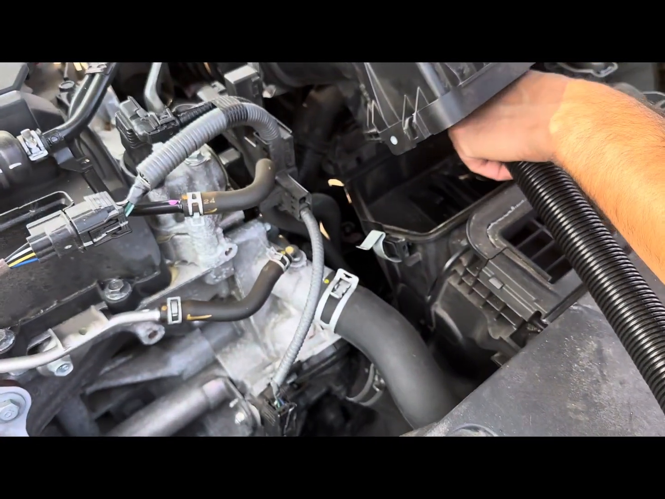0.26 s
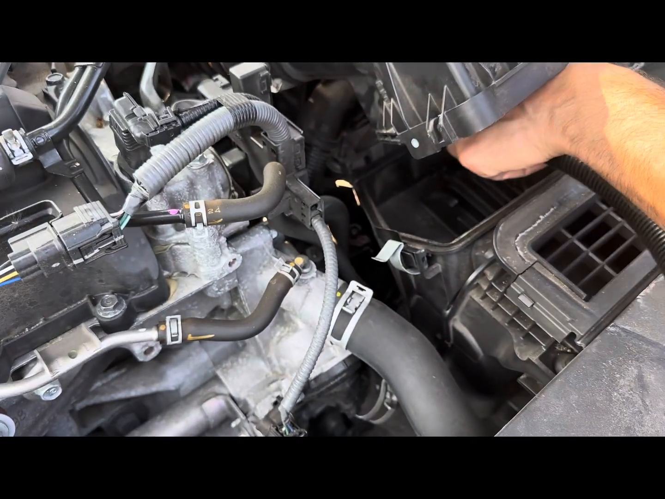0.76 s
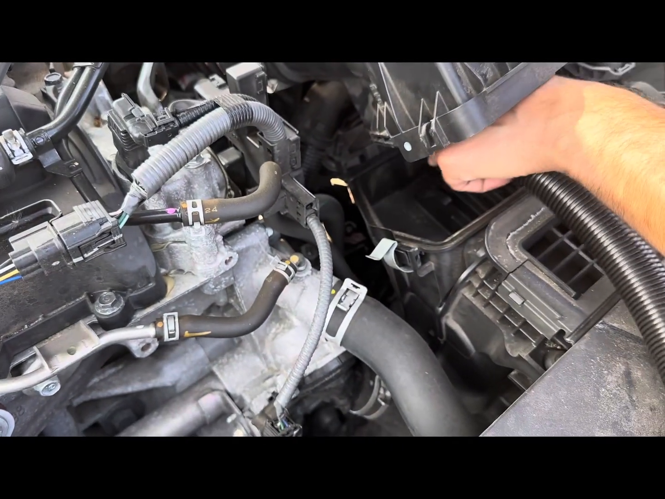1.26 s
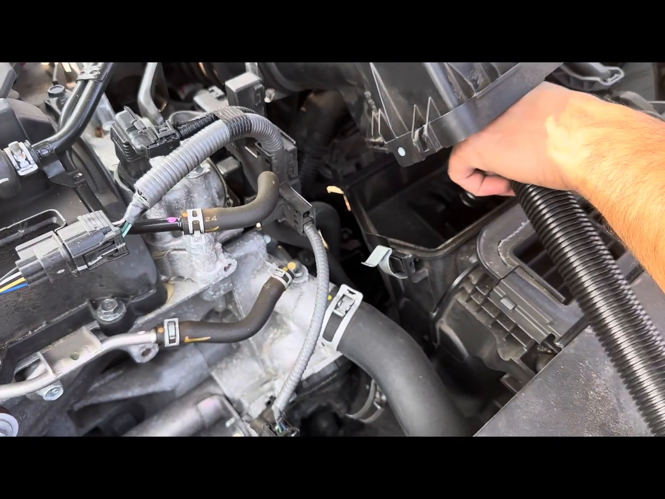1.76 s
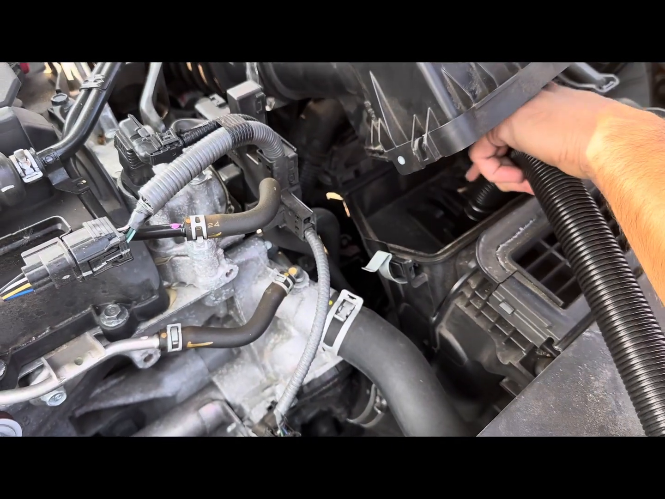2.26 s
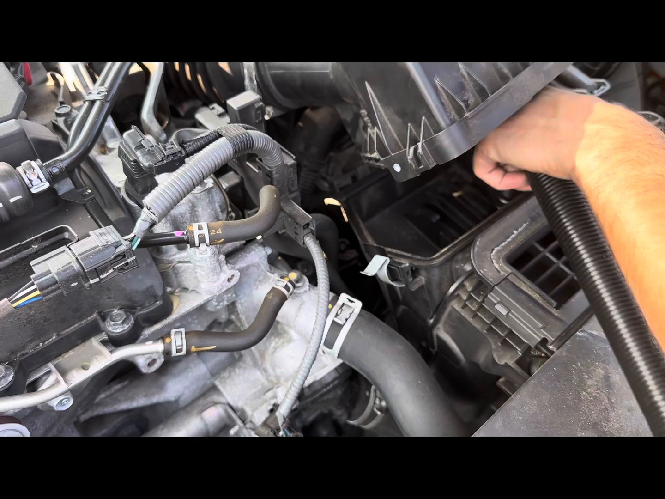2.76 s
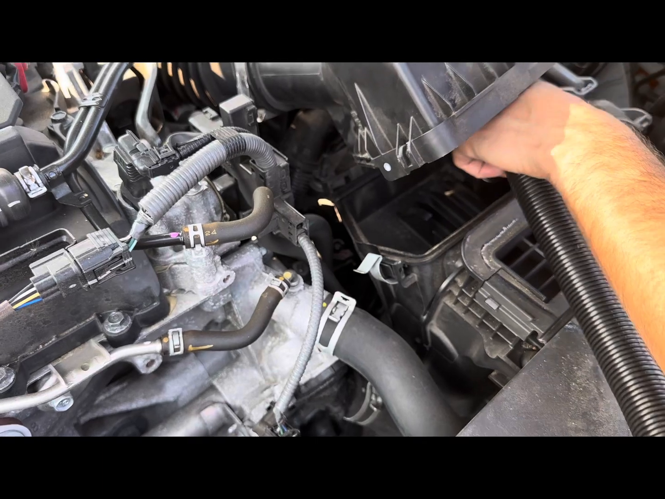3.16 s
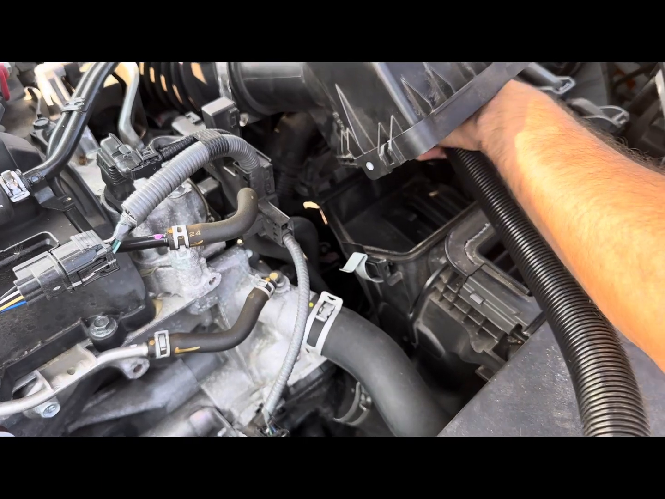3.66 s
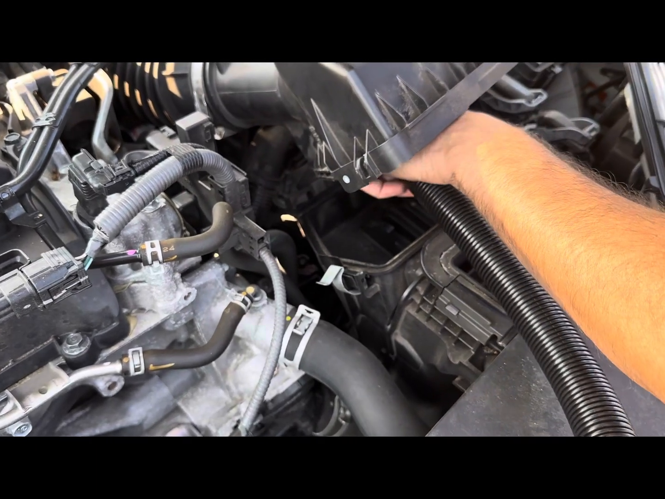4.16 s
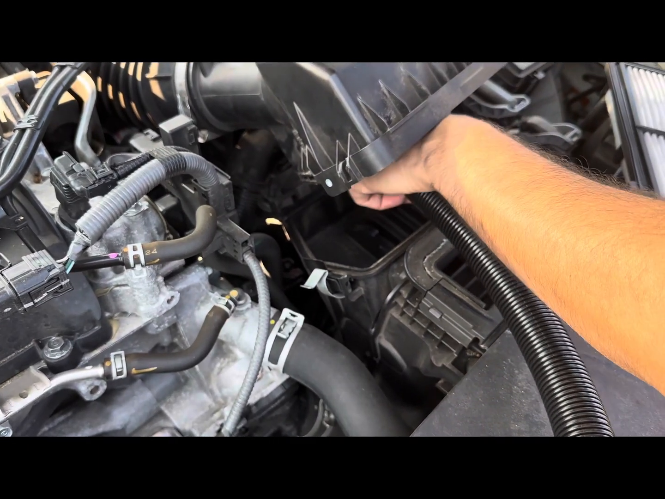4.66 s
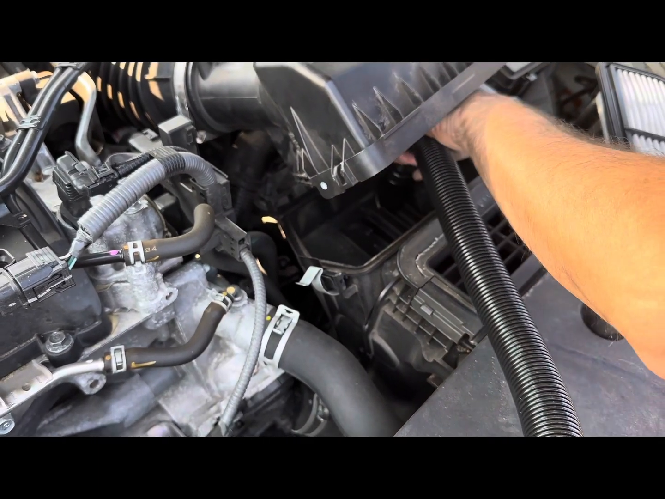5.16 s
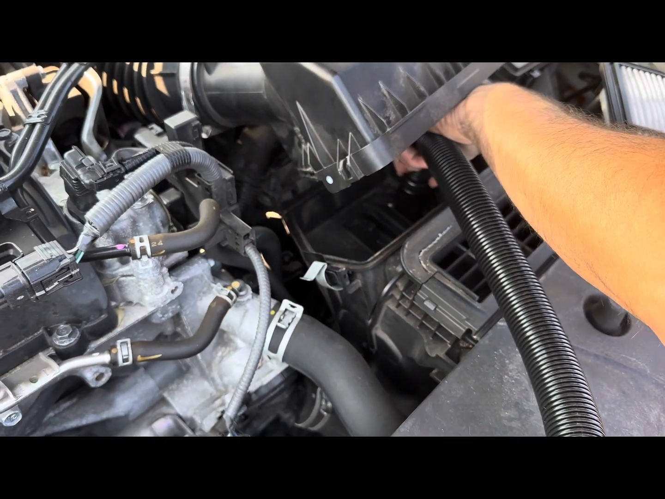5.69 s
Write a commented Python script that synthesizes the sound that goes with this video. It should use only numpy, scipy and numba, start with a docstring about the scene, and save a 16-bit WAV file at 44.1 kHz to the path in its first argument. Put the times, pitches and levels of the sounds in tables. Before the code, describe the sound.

A vacuum cleaner is already running at full power and continues unbroken for about six seconds. A mid-pitched motor hum of roughly 457 hertz, a piercing fan whine near 3.2 kilohertz and a low roar sit under rushing air and bright suction hiss. The ribbed hose adds a warbling half-whistle just below the whine. The nozzle knocks the hollow plastic filter box at 0.2, 0.6, most sharply at 0.9, and around 1.2 seconds, with dull hose bumps. From about 1.5 to 2.4 the hum weakens and flutters, the whine dips near 1.7, and thin high tones sing out. Light bumps and taps come near 2.6, then knocks and a tiny rim scrape at 3.1 to 3.3. A tap at 3.8 precedes a strong clack at 4.07, with smaller ones at 4.4 and 5.0. Later the nozzle hiss is softer and more shaded. Close stereo microphone, dry surroundings.

```python
"""A vacuum cleaner is already running beside a car: a shaft-rate hum, a seven-blade fan whine and rushing air.
Its nozzle works in the open air-filter housing; shaped noise makes the roar, hiss and hollow plastic box.
Swept noise bands make the half-whistle of the hose, and fluttering sines make the motor tones.
The nozzle knocks on the box (decaying modes and noise bursts) and scrapes its rim once (uneven slips).
The hose bumps the car body with dull, dying bands of low noise."""
import sys
import numpy as np
from scipy import signal
from scipy.fft import rfft, irfft
from scipy.io import wavfile
from scipy.ndimage import uniform_filter1d
from numba import njit

SR = 44100
rng = np.random.default_rng(int(sys.argv[2]) if len(sys.argv) > 2 else 0)


def transcribe(signal):
    """Save signal, clipped to [-1, 1], as a 16-bit WAV file at the path in sys.argv[1]."""
    frames = np.atleast_2d(signal).T
    limited = np.clip(frames, -1, 1)
    pcm = np.round(limited * 32767).astype(np.int16)
    wavfile.write(sys.argv[1], SR, pcm)


N = 261513  # length [samples]

# Levels in the tables are starting points: the functions add trims and flutter.
# Likeness of the noise at the two microphone ports: (frequency [Hz], correlation [-1..1])
LIKENESS = [(60, .88), (300, .72), (700, .5), (1200, .45), (1600, -.45), (2300, -.5), (2800, .5),
            (3600, .4), (4400, .05), (5300, -.35), (6400, .4), (7500, -.1), (10000, .1), (12000, .75)]
# Stereo balance of the air noise: (frequency [Hz], left minus right [dB])
BALANCE = [(100, -1.5), (700, 0), (1000, 3.5), (1900, -4), (2800, -6), (3600, 3), (4400, -1), (5200, 0),
           (6700, 0.5), (8800, -0.5), (13000, 0)]
# Phase between the ports around 3 kHz, for whine and hose whistle: (time [s], left lead [rad])
LEAD = [(0, -1.7), (.7, 0.5), (1.52, 0.1), (1.9, -3), (2.3, -2.5), (2.52, 0), (3.2, 0), (3.8, 0.5),
        (4.55, 1.2), (4.85, 1.5), (5.1, 0.2), (5.93, 0.7)]
# How far the nozzle has gone into the box: (time [s], depth [0-1])
DEPTH = [(0, 0.15), (.4, 0), (1.55, 0.28), (2.2, 0.6), (2.55, 0.2), (3.4, 0.57), (4.3, 1), (5.15, 0.94),
         (5.93, 0.93)]

# Noise colour of the steady machine roar: (frequency [Hz], relative level [dB])
ROAR = [(12, -44), (20, -26), (70, 2), (107, -6.5), (149, -2.5), (177, -13), (214, -7), (258, -8),
        (400, -3.5), (520, -2), (880, -120)]
# Noise colour of air rushing through the box: (frequency [Hz], relative level [dB])
BOX_AIR = [(250, -10), (380, 2.5), (520, 5.5), (700, -1), (1000, 1.5), (1300, -3), (1550, -0.5), (1900, 5),
           (2500, 5), (3400, 0), (3800, -58)]
# Air resonances of the open box: (frequency [Hz], width of each filter pass [Hz], relative level [dB])
CAVITY = [(655, 118, 0.5), (913, 134, -2.5), (1203, 163, 0), (1382, 91, -1), (1700, 78, 2), (1891, 88, 5),
          (2128, 83, 3.5), (2281, 79, 4)]
CAVITY_DRIFT = .014  # share by which the moving hand detunes them
# Hollow ring of the box: (time [s], level [dB])
HOLLOW = [(0, -34), (1.2, -35.5), (1.6, -35), (2.7, -36.5), (3.0, -36), (4.4, -37), (4.95, -34.5),
          (5.5, -36), (5.93, -33.5)]

# Hose bumping the body: (time [s], level [dB], t60 [s], centre [Hz])
BUMPS = [(0.205, -39, 0.14, 150), (0.59, -34.5, 0.19, 145), (1.143, -30, 0.3, 135),
         (1.236, -31.5, 0.25, 165), (1.439, -40.5, 0.28, 170), (2.16, -36, 0.2, 190),
         (2.556, -35, 0.13, 150), (2.649, -34, .15, 160), (4.074, -28, 0.14, 215), (4.756, -33, 0.14, 150)]
# Modes of the plastic housing: (frequency [Hz], t60 [s], relative level [dB])
BOX_MODES = [(640, .035, -2), (780, .045, 0), (926, .055, -.5), (1215, .05, -.5), (1310, .035, -1.5),
             (1445, .05, -4), (1700, .055, -2), (1930, .05, -8), (2125, .06, .5), (2680, .03, -8)]
# Nozzle scraping on the rim: (time [s], length [s], level [dB], first centre [Hz], last centre [Hz])
SCUFFS = [(3.277, 0.055, -32, 1850, 1700)]
SLIPS_PER_S = 170  # on average
# Nozzle against housing: (time [s], level [dB], centre of the ring [Hz], low cut [Hz], crack level [dB])
KNOCKS = [(.180, -20.5, 1130, 830, -16), (.617, -27, 1310, 800, -10), (.879, -29, 1300, 826, -20),
          (0.891, -13.5, 1280, 860, -20), (.897, -21.5, 1350, 860, -14), (1.162, -27.5, 1400, 950, -13),
          (1.238, -25.5, 1600, 700, -10), (1.250, -30, 1600, 600, 3), (2.56, -37, 1300, 500, -8),
          (2.650, -32, 1200, 600, -8), (3.070, -27.5, 1100, 800, -20), (3.246, -32, 1200, 700, -12),
          (3.294, -28.5, 1150, 1050, -20), (3.316, -34, 1550, 1000, -16), (3.830, -30, 1250, 620, -16),
          (4.0737, -17, 1650, 650, -12.5), (4.0765, -23, 540, 250, -1), (4.422, -31, 1500, 700, -12),
          (4.914, -32.5, 1700, 800, -12), (4.988, -25, 1250, 620, -15)]
KNOCK_DETUNE = 0.019  # share by which the pressing nozzle shifts the modes from knock to knock

# Hose whistle: (time [s], lower resonance level [dB], upper resonance level [dB])
WHISTLE = [(0.0, -44, -46), (0.08, -37, -38), (0.33, -32, -36), (0.92, -39.5, -34), (1.17, -32, -33.5),
           (1.58, -35.5, -37), (1.66, -29, -44), (1.72, -30, -35), (1.78, -33.5, -43), (2.11, -37, -44),
           (2.29, -36, -39), (2.37, -32, -39), (2.48, -30, -33), (2.62, -31.5, -37), (2.72, -38, -34),
           (2.86, -34, -37), (2.94, -30.5, -35.5), (3.1, -38, -36), (3.24, -31.5, -35.5), (3.51, -39, -38),
           (3.58, -34, -38.5), (3.78, -33, -33.5), (3.91, -41, -43), (4.02, -34.5, -36), (4.19, -31, -37),
           (4.28, -37, -38), (4.37, -32, -39), (4.71, -34.5, -37), (4.82, -47, -38), (4.88, -38, -43),
           (5.0, -43, -39), (5.15, -38, -38), (5.65, -35.5, -36), (5.86, -39, -39), (5.93, -44, -37.5)]
# Centre of the lower hose resonance: (time [s], frequency [Hz])
WHISTLE_PITCH = [(0, 2760), (1.2, 2760), (1.8, 2735), (2.05, 2750), (2.22, 2815), (2.38, 2730), (3.8, 2764),
                 (4.5, 2765), (5.93, 2770)]
HOSE_UPPER_HZ = 2948  # before the warble

# Noise colour of the main hiss: (frequency [Hz], relative level [dB])
HISS = [(2500, -14), (3400, 2), (3850, 0), (4300, 4), (4600, 1.5), (4900, 2), (5400, -4), (6800, -35),
        (9000, -63)]
# Noise colour of the fine spray of hiss: (frequency [Hz], relative level [dB])
SPRAY = [(5000, -21), (7200, 8.5), (8200, 8), (8500, 6), (8700, 13.5), (8900, 4.5), (9400, 7), (10200, 1.5),
         (11000, -47), (13000, -64.5)]
# Fine spray of hiss: (time [s], level [dB])
SPRAY_LEVEL = [(0, -35), (1.5, -34.5), (2.6, -41), (2.74, -34.5), (3.1, -37.5), (3.8, -36), (4.9, -39),
               (5.93, -38)]
# Gap between nozzle and wall: (time [s], resonance [Hz], hiss level [dB])
GAP = [(0, 6250, -28.5), (.5, 6650, -27), (.7, 5950, -29), (1.12, 5950, -27), (1.27, 6530, -27.5),
       (1.57, 6400, -29.5), (1.87, 5830, -34), (2.25, 6400, -31), (2.42, 6820, -26), (2.6, 6650, -28),
       (2.78, 6060, -35), (3.75, 5950, -34), (4.55, 6010, -36), (4.85, 5900, -40.5), (5.5, 6140, -40),
       (5.93, 6100, -36.5)]
# Notch that the echo from the wall cuts into the hiss: (time [s], centre [Hz], depth [0-1])
NOTCH = [(0, 5300, 0), (.35, 5240, 0.6), (.8, 4850, 0.3), (1.1, 4800, .3), (1.3, 5350, 0.4),
         (1.5, 5280, .8), (1.85, 5150, .4), (2.1, 5100, 0), (2.95, 4930, 0.3), (3.6, 4600, 0.1),
         (4.35, 4250, 0.7), (5.0, 4030, 0.2), (5.75, 3680, 0.4)]
NOTCH_WIDTH_HZ = 290
# Higher cross modes of the nozzle: (frequency [Hz], width of each filter pass [Hz], relative level [dB])
NOZZLE_MODES = [(5300, 140, 4.5), (5580, 170, 3.5), (5950, 110, 2.5), (6400, 91, -4.5), (6650, 130, 2),
                (6876, 154, 1)]
NOZZLE_DRIFT = 0.0093  # share by which the tilting nozzle detunes them
CROSS_REACH_HZ = 1100  # modes farther than this from the gap resonance are hardly stirred
# The hand slips under the lid and shades one side from the nozzle
SHADE_S, SHADE_TAKES_S = 2.71, 0.2  # middle of the move, its length

# Motor speed: (time [s], shaft rate [Hz])
SPEED = [(0, 452), (.2, 455), (.62, 456.6), (1.27, 457.1), (1.57, 456), (2.12, 458.5), (2.55, 456.8),
         (3.05, 457.2), (3.9, 458.3), (4.72, 457.2), (5.35, 458.6), (5.93, 458.4)]
# Hum as the arm moves through its standing waves: (time [s], level [dB])
HUM = [(0, -31.5), (.57, -35.5), (.73, -25), (.83, -31.5), (.96, -28), (1.12, -28), (1.19, -39), (1.5, -37),
       (1.6, -46), (1.83, -43.5), (1.89, -35), (1.96, -35), (2.12, -43.5), (2.25, -35.5), (2.33, -43),
       (2.45, -33), (2.8, -31.5), (2.88, -35.5), (2.97, -30.5), (3.57, -30), (3.7, -33), (3.95, -33.5),
       (4.2, -31), (4.31, -35), (4.42, -29.5), (4.72, -32.5), (4.81, -35.5), (4.92, -29.5), (5.2, -30.5),
       (5.93, -30.5)]
# Brief dips in the hum: (time [s], length [s], drop [dB])
HUM_DIPS = [(0.068, 0.029, 11), (0.545, .035, 8), (1.407, 0.038, 5), (1.986, 0.026, 12), (2.172, .04, 7),
            (2.32, 0.069, 5), (2.696, 0.035, 2), (3.067, 0.03, 8), (3.615, 0.055, 11), (3.745, .045, 4.5)]
DIP_EDGE_S = 0.017
# Fan whine in its standing waves: (time [s], level [dB])
WHINE = [(0, -32), (.35, -32.5), (.75, -25.5), (1.1, -26.5), (1.53, -29), (1.66, -40), (1.73, -46),
         (1.87, -33), (2.06, -38), (2.19, -30), (2.28, -36), (2.33, -36), (2.38, -42), (2.52, -31.5),
         (3.45, -33.5), (3.75, -30), (3.92, -36), (4.08, -32), (4.26, -40), (4.38, -33), (4.64, -30),
         (4.76, -34), (4.85, -34.5), (5.08, -30), (5.93, -32.5)]
# Weaker motor tones: (multiple of shaft rate, level [dB], left minus right [dB])
OVERTONES = [(2, -56, 0), (3, -56, 0), (5, -55, -4), (14, -54, 3), (19, -57, -6), (21, -60, -4)]
# Thin high motor tones: (multiple of shaft rate, level with the nozzle out of the box [dB])
SING = [(10, -49.5), (15, -46.5), (20, -48.5)]
# A thin tone sings out for a moment: (time [s], length [s], multiple of shaft rate, rise [dB])
FLARES = [(1.3, .45, 3, 5), (2.36, .18, 3, 10), (5.81, .2, 3, 12), (1.25, .35, 5, 7), (1.43, .91, 10, 10.5),
          (1.75, .59, 10, 2.5), (1.9, .44, 10, 3.5), (5.2, .55, 10, 7), (1.3, .5, 15, 4),
          (2.33, 1.15, 15, 5.5), (3.5, .65, 15, 4.5), (2.64, .96, 20, 7), (4.63, 0.14, 20, 16)]
FLARE_EDGE_S = 0.03

TOP_HZ = 15750  # edge of the treble cut


def undb(db):
    """Decibels to gain."""
    return 10 ** (np.asarray(db) / 20)


def unit(x):
    """Scale to rms 1."""
    return x / np.sqrt(np.mean(x ** 2))


def curves(table):
    """Each column of a timed table, sample by sample."""
    s, *columns = np.transpose(table)
    return [np.interp(np.arange(N) / SR, s, c) for c in columns]


def bins():
    """Frequencies of the spectrum of the whole scene, kept just above zero."""
    return np.arange(N // 2 + 1) * SR / N + 1e-6


def across(points):
    """Join (frequency [Hz], value) points on a log-frequency axis."""
    hz, value = np.transpose(points)
    return np.interp(np.log(bins()), np.log(hz), value)


def walk(rate):
    """Smooth random wander of rms 1, from about `rate` fresh values a second."""
    k = int(SR / rate)
    held = np.repeat(rng.standard_normal(N // k + 2), k)[rng.integers(k):][:N]
    return unit(uniform_filter1d(uniform_filter1d(held, k), k))


def window(start, length, edge):
    """1 during an event and 0 outside it, with sloping edges."""
    t = np.arange(N) / SR
    return np.clip(.5 + np.minimum(t - start, start + length - t) / edge, 0, 1)


def fade(t, t60):
    """Exponential decay, 60 dB down after t60."""
    return np.exp(-np.log(1000) * t / t60)


def pan(db):
    """Left and right gains for a level difference."""
    return undb(np.array([[1], [-1]]) * db / 2)


def inside(out_db, in_db):
    """A level that moves from one value to another as the nozzle goes into the box."""
    depth, = curves(DEPTH)
    return out_db + (in_db - out_db) * depth


def shaded(open_db, covered_db):
    """A level that changes as the hand slips under the lid."""
    share = np.clip(.5 + (np.arange(N) / SR - SHADE_S) / SHADE_TAKES_S, 0, 1)
    return open_db + (covered_db - open_db) * share


def two_ports(mid, side, alike):
    """Mix shared and opposed noise into two ports of a given correlation."""
    return mid * np.sqrt(1 + alike) + np.array([[1], [-1]]) * side * np.sqrt(1 - alike)


def air(gain):
    """Turbulence of a given colour as the two ports hear it; their mean has rms 1."""
    alike = np.clip(across(LIKENESS), -.98, .98)
    mid, side = rfft(rng.standard_normal((2, N)))
    ports = two_ports(mid, side, alike)
    x = irfft(ports * gain * pan(across(BALANCE)), N)
    return x / np.std(x.mean(axis=0))


def gusty(points, patchy_db=1.9, count=4):
    """Hiss whose interleaved narrow bands swell and fade apart, as the path of the air shifts."""
    spectrum = rfft(air(undb(across(points))))
    group = (bins() // 450).astype(int) % count  # 450 Hz bands, dealt out in turn
    bands = (irfft(spectrum * (group == k), N) * undb(patchy_db * walk(6.5)) for k in range(count))
    return unit(sum(bands))


def burst(t, lo_hz, hi_hz, t60):
    """A dying band of noise, partly alike at the two ports."""
    band = signal.butter(3, [lo_hz, hi_hz], "band", fs=SR, output="sos")
    mid, side = signal.sosfilt(band, rng.standard_normal((2, len(t))))
    return unit(mid + 0.43 * side * np.array([[1], [-1]])) * fade(t, t60)


def resonance(hz, width):
    """Complex response of one resonance, gain 1 at its centre."""
    return 1 / (1 + 1j * (bins() ** 2 - hz ** 2) / (bins() * width))


@njit
def sweep(x, hz, width):
    """Band-pass with a moving centre: a two-integrator filter, gain 1 at the centre."""
    y, band, low = np.empty(len(x)), 0., 0.
    for i in range(len(x)):
        g, k = np.tan(np.pi * hz[i] / SR), width / hz[i]
        v = (band + g * (x[i] - low)) / (1 + g * (g + k))
        band, low, y[i] = 2 * v - band, low + 2 * g * v, k * v
    return y


def moving(ports, hz, width):
    """A steep resonance with a moving centre, two passes on both ports; rms 1."""
    width = float(width)
    return unit(np.array([sweep(sweep(port, hz, width), hz, width) for port in ports]))


def roar():
    """Steady low roar of the machine: coloured turbulence with a slight waver."""
    return air(undb(across(ROAR))) * undb(-43.5 + 1.7 * walk(11))


def housing():
    """Rushing air stirs the hollow of the box; its resonances shift as the hand moves."""
    hollow_db, = curves(HOLLOW)
    rush = air(undb(across(BOX_AIR))) * undb(-37.0 + .5 * walk(7.3))
    stir = air(abs(resonance(1400, 6000)))
    hollow = 0
    for hz, width, db in CAVITY:
        swell_db = 1.5 * walk(3) + 1.2 * walk(14)
        centre_hz = hz * (1 + CAVITY_DRIFT * walk(2.506))
        hollow = hollow + moving(stir, centre_hz, width) * undb(db + swell_db)
    return rush + unit(hollow) * undb(hollow_db + 2.0)


def bumps():
    """The soft hose bumps the car body with a dull thud: dying low noise with a softened onset."""
    out = np.zeros((2, N + SR))
    t = np.arange(SR // 2) / SR
    for s, db, t60, centre_hz in BUMPS:
        body = burst(t, 0.6 * centre_hz, 1.6 * centre_hz, t60)
        weight = undb(-7.0) * burst(t, 35, 75, t60)
        start = int(s * SR)
        out[:, start:start + len(t)] += (body + weight) * (1 - fade(t, 0.015)) * undb(db)
    return out[:, :N]


def scuffs():
    """The nozzle rattles over the rim: separate, uneven slips drive the modes of the box."""
    times = np.cumsum(rng.uniform(.4, 1.6, N // 50)) * SR / SLIPS_PER_S
    times = times[times < N].astype(int)
    slips = np.zeros((2, N))
    slips[:, times] = rng.uniform(0.46, 1, (2, len(times)))
    body = sum(undb(db) * resonance(hz, np.log(1000) / (np.pi * t60)) for hz, t60, db in BOX_MODES)
    rub = irfft(rfft(slips) * (body + 0.19), N)  # 0.19 lets some bare slip through
    out = 0
    for s, length, db, first_hz, last_hz in SCUFFS:
        centre_hz, = curves([(s, first_hz), (s + length, last_hz)])
        out = out + moving(rub, centre_hz, 1300) * window(s, length, 0.018) * undb(db)
    return out


def knocks(spread_db=2.0, slope_db=4.0):
    """The nozzle sets the box ringing under a clack and crack; the spot hit decides which modes ring most."""
    out = np.zeros((2, N + SR))
    t = np.arange(SR // 4) / SR
    hz, t60, mode_db = np.transpose(BOX_MODES)
    for s, db, centre_hz, low_hz, crack_db in KNOCKS:
        spot_db = -slope_db * np.log2(hz / centre_hz) ** 2
        gain = undb(mode_db + spot_db + spread_db * rng.standard_normal(len(hz)))
        ring_hz = hz * (1 + KNOCK_DETUNE * rng.standard_normal(len(hz)))
        # modes start together with alternating polarity, and the two ports hear each a little apart
        phase = np.pi * np.arange(len(hz)) + 0.5 * rng.standard_normal((2, len(hz)))
        ring = 0
        for g, f, decay, p in zip(gain, ring_hz, t60, phase.T):
            ring = ring + g * np.sin(2 * np.pi * f * t + p[:, None]) * fade(t, decay)
        blow = ring / np.linalg.norm(gain)
        # five independent contact noises, all at the moment of impact
        for size in [0.5, 0.93, 1.0, 0.18, 0.45]:
            clack = burst(t, 0.75 * centre_hz, 1.51 * centre_hz, 0.0027)
            crack = burst(t, 1100, 4600, 0.07) * undb(crack_db - 6.0)
            blow += size * (undb(5.0) * clack + crack)
        blow = signal.sosfilt(signal.butter(6, low_hz, "high", fs=SR, output="sos"), blow)
        onset_rms = np.std(blow[:, :SR // 100])  # the level counts over the first 10 ms
        start = int(s * SR)
        out[:, start:start + len(t)] += blow * undb(db) / onset_rms
    return out[:, :N]


def hose():
    """Flow makes the ribbed hose half whistle: two warbling bands under the whine, the lower one tighter."""
    lead, = curves(LEAD)
    lower_db, upper_db = curves(WHISTLE)
    centre_hz, = curves(WHISTLE_PITCH)
    alike = np.clip(0.26 + 0.48 * np.cos(lead), -.95, .95)
    mid, side = rng.standard_normal((2, N))
    ports = two_ports(mid, side, alike)
    warble = 1 + .007 * walk(35) + .004 * walk(7)
    lower = moving(ports, centre_hz * warble, 125) * undb(lower_db + 2.5)
    upper = moving(ports, HOSE_UPPER_HZ * warble, 227) * undb(upper_db + 1.0)
    return (lower + upper) * pan(inside(-2.0, -3.5))


def cross_modes(gap_hz):
    """The modes of the nozzle drift as it tilts; those near the gap resonance ring most."""
    stir = air(abs(resonance(6000, 6000)))
    out = 0
    for hz, width, db in NOZZLE_MODES:
        near = 1 / (1 + ((hz - gap_hz) / CROSS_REACH_HZ) ** 4)
        swell_db = 2 * walk(4)
        centre_hz = hz * (1 + NOZZLE_DRIFT * walk(3))
        out = out + moving(stir, centre_hz, width) * near * undb(db + swell_db)
    return unit(out)


def cancelled(ports):
    """The echo from the wall cancels one band of the hiss; the notch slides as the nozzle moves."""
    notch_hz, cut = curves(NOTCH)
    band = np.array([sweep(port, notch_hz, float(NOTCH_WIDTH_HZ)) for port in ports])
    return ports - np.clip(cut, 0, 1) * band


def suction():
    """Air hisses into the nozzle; pitch shifts with the gap to the wall, and the hand shades one side."""
    gap_hz, gap_db = curves(GAP)
    spray_db, = curves(SPRAY_LEVEL)
    tremor = walk(11)  # the unsteady hand opens and closes the gap a little
    hiss = gusty(HISS) * undb(inside(-31.0, -36.0) + .5 * walk(25.33))
    spray = gusty(SPRAY) * undb(spray_db + .5 * walk(11.0)) * pan(shaded(-4.0, -2.0))
    tube = cross_modes(gap_hz)
    centre_hz = gap_hz * (1 + .012 * tremor)
    gap_air = air(abs(resonance(4940, 2200)) ** 2)
    gap = unit(np.array([sweep(port, centre_hz, 660.0) for port in gap_air]))
    gap = gap * undb(1.2 * tremor)
    nozzle = (undb(-4.0) * tube + undb(-5.0) * gap) * undb(gap_db) * pan(shaded(1.8, 10.6))
    # the topmost sheen follows the spray by half as many dB
    sheen_db = -45.5 + .5 * (spray_db - spray_db.mean()) + 0.66 * walk(14)
    sheen = air(abs(resonance(13980, 1500)) ** 2) * undb(sheen_db)
    return cancelled(hiss + nozzle) + spray + sheen


def tone(phase, scatter, rate, lead=0.):
    """A motor tone of rms near 1: a direct part plus reflections that flutter differently at each port."""
    direct = np.exp(1j * lead * np.array([[1], [-1]]) / 2)
    echoes = np.array([walk(rate) + 1j * walk(rate) for _ in range(2)])
    level = np.sqrt(2 / (1 + 2 * scatter ** 2))
    return level * np.imag((direct + scatter * echoes) * np.exp(1j * phase))


def flare(multiple):
    """Rise in dB of one motor tone while it sings out."""
    return sum(rise_db * window(s, length, FLARE_EDGE_S)
               for s, length, k, rise_db in FLARES if round(k) == round(multiple))


def thin_tones(turn):
    """High multiples of the shaft rate sink with depth and now and then sing out."""
    out = 0
    for k, db in SING:
        level_db = db + inside(0, -7.5) + flare(k) + .9 * walk(4)
        out = out + tone(round(k) * turn, scatter=0.41, rate=45, lead=.4) * undb(level_db)
    return out


def weak_tones(turn):
    """Fainter motor overtones, each with its own place between the ports."""
    out = 0
    for k, db, side_db in OVERTONES:
        level_db = db + flare(k) + 2 * walk(1.5)
        out = out + tone(k * turn, scatter=.7, rate=14) * undb(level_db) * pan(side_db)
    return out


def motor():
    """Imbalance hums once a turn, seven blades whine, and the motor adds thin overtones."""
    shaft_hz, = curves(SPEED)
    hum_db, = curves(HUM)
    whine_db, = curves(WHINE)
    lead, = curves(LEAD)
    turn = 2 * np.pi * np.cumsum(shaft_hz * (1 + 0.00038 * walk(24.5))) / SR
    # scatter grows as the hum weakens, so it flutters most there
    hum_scatter = undb(-49.0 - hum_db)
    dip_db = sum(drop_db * window(s, length, DIP_EDGE_S) for s, length, drop_db in HUM_DIPS)
    hum = tone(turn, scatter=hum_scatter, rate=18, lead=1.0)
    hum = hum * undb(hum_db - dip_db + 0.9) * pan(inside(-1.4, -9.0))
    whine = tone(7 * turn, scatter=0.14, rate=170, lead=lead)
    whine = whine * undb(whine_db + 4.0) * pan(inside(-1.9, -4.0) + 0.92 * walk(2.64))
    return hum + whine + thin_tones(turn) + weak_tones(turn)


def scene():
    """Machine, air and handling together."""
    return roar() + housing() + bumps() + scuffs() + knocks() + hose() + suction() + motor()


def record(dry):
    """The phone cuts the top of the treble with a steep low-pass."""
    return signal.sosfilt(signal.ellip(10, .2, 80, TOP_HZ, fs=SR, output="sos"), dry)


dry = scene()
out = record(dry)
transcribe(out)
```